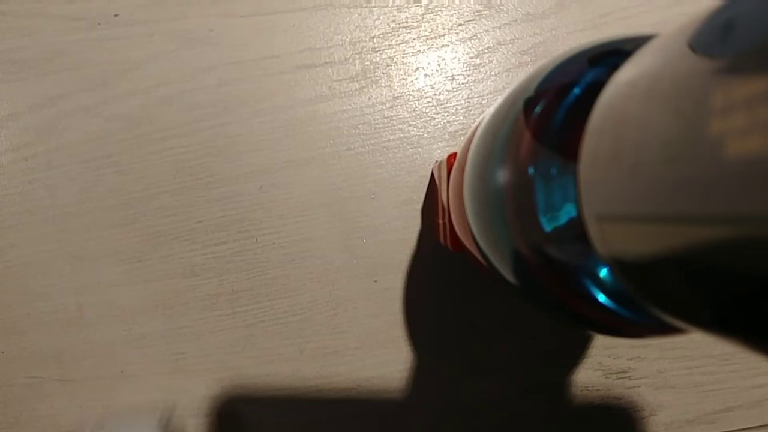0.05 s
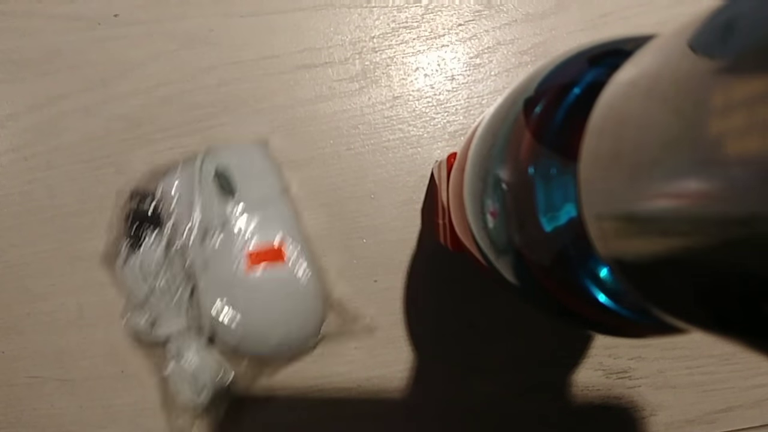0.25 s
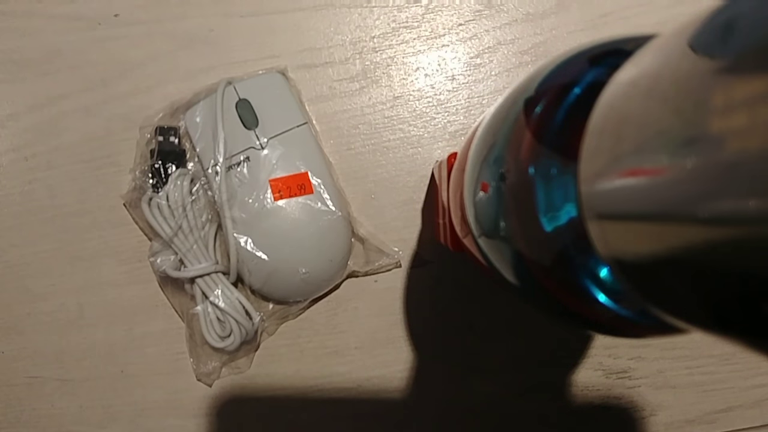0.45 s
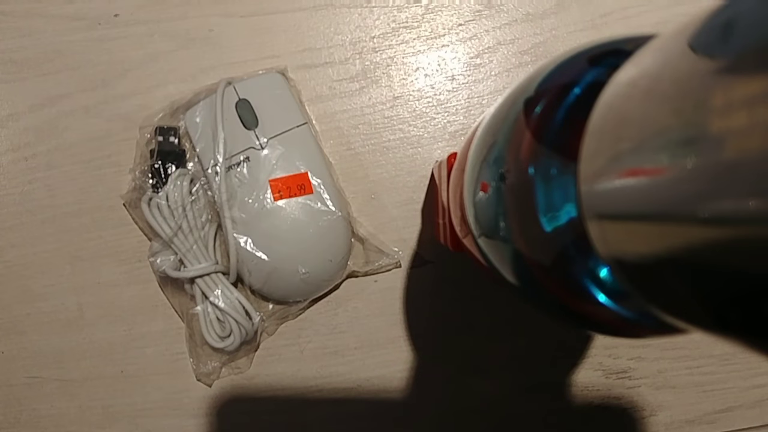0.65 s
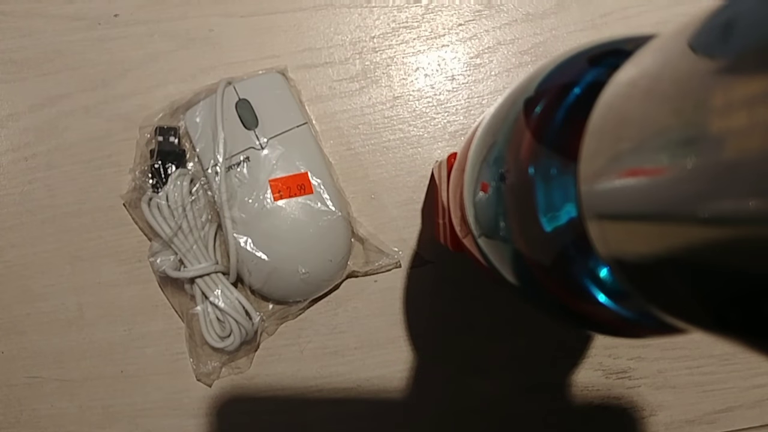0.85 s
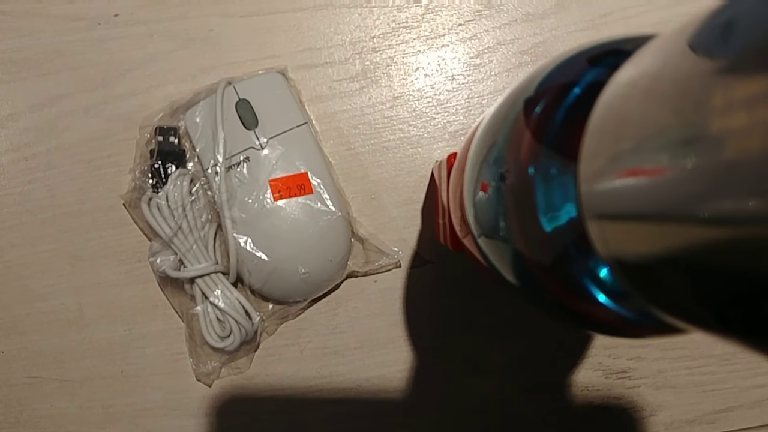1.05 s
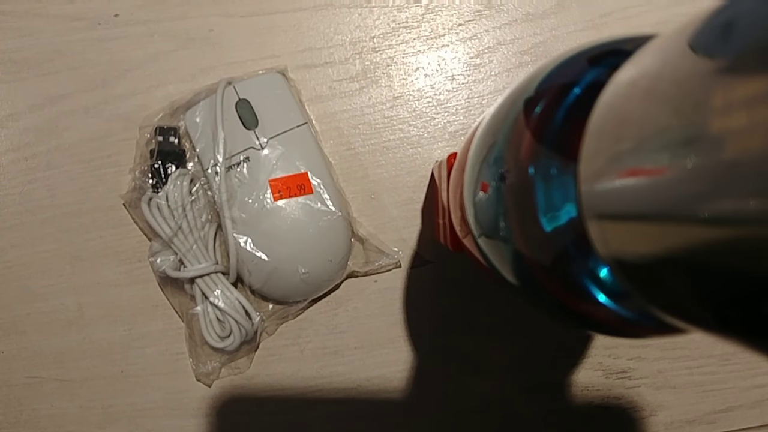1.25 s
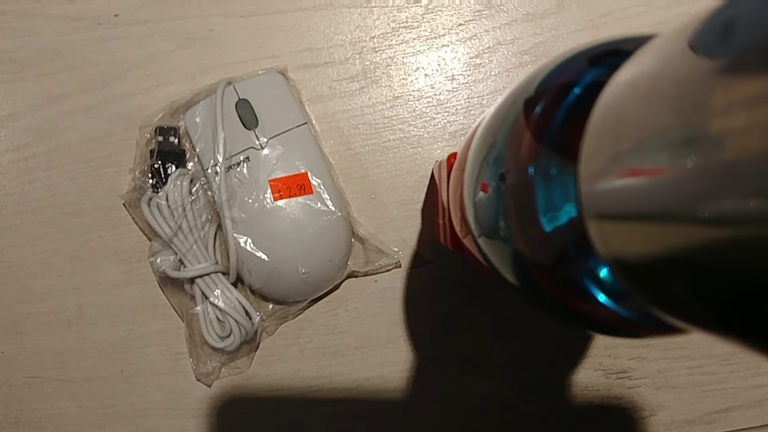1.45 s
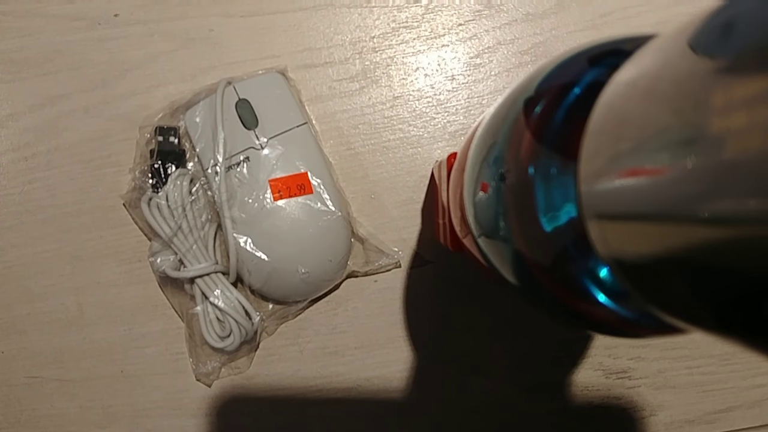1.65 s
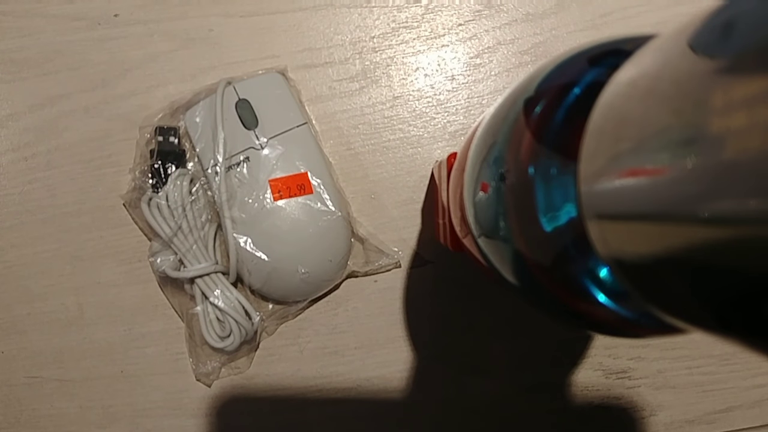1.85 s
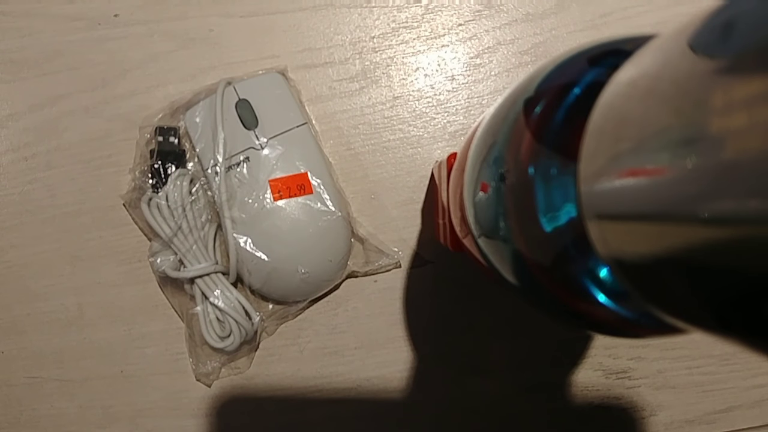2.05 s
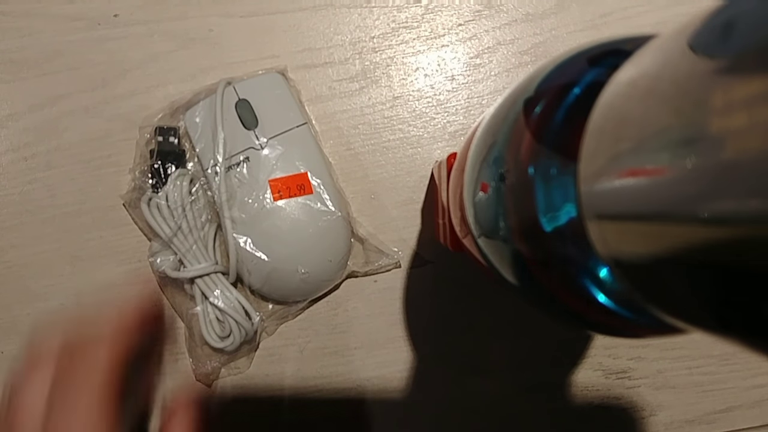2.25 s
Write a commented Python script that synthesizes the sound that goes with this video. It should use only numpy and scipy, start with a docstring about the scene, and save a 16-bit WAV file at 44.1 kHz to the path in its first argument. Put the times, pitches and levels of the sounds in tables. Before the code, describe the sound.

Plastic-wrapped mouse thuds onto a wooden table with a crinkle, then a faint hand rustle.

```python
"""A thin plastic bag crinkles as a computer mouse inside it is let go over a wooden table.
Mouse, plug and coiled cable land in a quick clatter that rings the table top, shakes the
close microphone and ends in a flat slap. The low rumble of a small quiet room runs
underneath, and at the end a hand rustles as it reaches in."""
import sys
import numpy as np
from scipy import signal
from scipy.fft import rfft, irfft, next_fast_len
from scipy.io import wavfile

SR = 44100
rng = np.random.default_rng(int(sys.argv[2]) if len(sys.argv) > 2 else 0)


def store_pcm(level_fs):
    """Save levels as 16-bit WAV."""
    pcm = np.round(np.clip(level_fs, -1, 1) * 32767).astype(np.int16)
    wavfile.write(sys.argv[1], SR, np.atleast_2d(pcm).T)


N = 101429
TIME_S = np.arange(N) / SR


def from_db(db):
    """Decibels to gain."""
    return 10 ** (np.asarray(db) / 20)


def at_hz(points, hz):
    """Table lookup on a log-frequency axis."""
    points_hz, values = np.transpose(points)
    return np.interp(np.log(hz + 1), np.log(points_hz), values)


def delayed(x, delay_s):
    """Fractional delay."""
    return np.interp(TIME_S - delay_s, TIME_S, x, left=0)


def coloured(x, colour):
    """Minimum-phase filter with the given spectrum."""
    size = 2 * next_fast_len(N)
    gain = from_db(at_hz(colour, np.fft.rfftfreq(size, 1 / SR)))
    cepstrum = irfft(np.log(gain))
    cepstrum[1:size // 2] *= 2
    cepstrum[size // 2 + 1:] = 0
    return irfft(rfft(x, size) * np.exp(rfft(cepstrum)))[..., :N]


def noise(colour, correlation):
    """Stereo noise, rms 1, with the given spectrum and channel correlation."""
    size = 2 * next_fast_len(N // 2 + 1)
    hz = np.fft.rfftfreq(size, 1 / SR)
    alike = np.clip(at_hz(correlation, hz), -.99, .99)
    mid, side = rfft(rng.standard_normal((2, size))) * from_db(at_hz(colour, hz))
    x = irfft(np.sqrt(1 + alike) * mid + np.sqrt(1 - alike) * side * [[1], [-1]])[:, :N]
    return x / x.std()


def clicks(times_s, db):
    """One impulse per event."""
    x = np.zeros(N)
    x[np.clip(np.asarray(times_s) * SR, 0, N - 1).astype(int)] = from_db(db)
    return x


def ring(x, hz, t60_s):
    """Resonator: a unit click starts a decaying sine of height 1."""
    r = np.exp(-np.log(1000) / (t60_s * SR))
    w = 2 * np.pi * hz / SR
    return signal.lfilter([0, np.sin(w)], [1, -2 * r * np.cos(w), r * r], x + 1e-18)


def struck(times_s, db, modes, spread_db=2):
    """Every blow rings every mode at a slightly random strength; modes alternate in sign."""
    scatter_db = spread_db * rng.standard_normal((len(times_s), len(modes)))
    return sum((-1) ** k * ring(clicks(times_s, db + mode_db + scatter_db[:, k]), hz, t60_s)
               for k, (hz, mode_db, t60_s) in enumerate(modes))


# left-right likeness of near sounds: (frequency [Hz], correlation [ratio])
NEAR_CORRELATION = [(150, 0.94), (600, 0.41), (1500, .3), (6000, 0.03)]
def burst(times_s, db, colour, t60_s):
    """Each blow rings a crowd of close resonances, as decaying noise; unit energy at 0 dB."""
    decay = np.exp(-2 * np.log(1000) / (t60_s * SR))
    power = signal.lfilter([1 - decay], [1, -decay], clicks(times_s, db) ** 2 + 1e-18)
    return np.sqrt(power) * noise(colour, NEAR_CORRELATION)


# crinkle envelope as the bag slips, falls, lands and settles: (time [s], level [dB])
CRINKLE_ENVELOPE = [(0, -59.5), (.12, -61.5), (.145, -42.5), (.17, -47.5), (.214, -46.5), (.228, -23),
                    (.28, -26.5), (.35, -46), (.47, -58), (.53, -80)]
# film spectrum: (frequency [Hz], level [dB])
FILM_COLOUR = [(200, -8), (620, -3.5), (1000, -6), (2200, -6.5), (3500, -3.5), (5600, -4.5), (8400, -1.5),
               (10200, -24), (15000, -14)]
def bag_crinkle(snaps_per_s=2000, spread_db=3.5):
    """Thin film crinkles in dense tiny snaps of uneven size."""
    sizes = from_db(spread_db * np.minimum(rng.exponential(1, (2, N)), 4))
    signs = rng.choice([-1, 1], (2, N))
    snapping = rng.random((2, N)) < snaps_per_s / SR
    film = coloured(sizes * signs * snapping, FILM_COLOUR)
    envelope_db = np.interp(TIME_S, *np.transpose(CRINKLE_ENVELOPE), right=-np.inf)
    return from_db(envelope_db) * film / film.std()


# rumble and hiss spectrum: (frequency [Hz], level [dB])
RUMBLE_COLOUR = [(15, -67.5), (25, -37.5), (45, -16), (73, -0.5), (131, -11), (163, -2.5), (207, -12),
                 (286, -8), (400, -15), (588, -16.5), (800, -20.5), (1300, -22.5), (2180, -28), (9270, -44),
                 (15000, -44)]
# its left-right likeness: (frequency [Hz], correlation [ratio])
RUMBLE_CORRELATION = [(60, 0.83), (300, 1), (1000, 0.67), (3000, 0.037)]
# low room resonances: (frequency [Hz], level [dB], t60 [s])
DRONE_MODES = [(92, -70.5, 0.57), (180, -71.5, 0.25)]
def room_tone(rumble_db=-56.5, left_gain_db=2, left_lag_s=.00041):
    """Steady rumble and faint hiss; the room's low resonances add wavering drones."""
    tone = from_db(rumble_db) * noise(RUMBLE_COLOUR, RUMBLE_CORRELATION)
    for hz, db, t60_s in DRONE_MODES:
        drone = ring(rng.standard_normal(N + SR), hz, t60_s)[SR:]
        tone += from_db(db) * drone / drone.std()
    left, right = tone
    return np.array([from_db(left_gain_db) * delayed(left, left_lag_s), right])


# bumps in the fingers: (time [s], level [dB])
BUMPS = [(.029, -47.5), (.147, -38), (.196, -44)]
# hollow mouse body: (frequency [Hz], level [dB], t60 [s])
HOLLOW_MODES = [(600, -2, .045), (665, -5, .028)]
def mouse_bumps():
    """The mouse knocks hollowly in the fingers as it is let go."""
    return struck(*np.transpose(BUMPS), HOLLOW_MODES)


# single creases: (time [s], level [dB], pitch [Hz])
CREASES = [(0.0314, -24, 5800), (0.067, -25.5, 7300), (.1295, -30, 6500), (.1392, -23, 7500),
           (0.1476, -21.5, 5150), (0.1828, -15, 6000), (0.196, -22.5, 5000)]
# snap spectrum: (frequency [Hz], level [dB])
CREASE_COLOUR = [(400, -21), (3800, -13.5), (5800, 0), (8000, -3), (10000, -31), (15000, -32)]
def bag_creases(ping_gain_db=-13):
    """Each crease snaps and rings briefly at its own pitch."""
    times_s, snap_db, _ = np.transpose(CREASES)
    snaps = burst(times_s, snap_db, CREASE_COLOUR, t60_s=.016)
    pings = sum(ring(clicks([s], db + ping_gain_db), hz, t60_s=.009) for s, db, hz in CREASES)
    return snaps + pings


# contacts with the table: (time [s], wood knock [dB], plastic clack [dB], shell rap [dB])
CONTACTS = [(.2232, -4.5, 1.5, -2.5), (0.2305, -1.5, -0.5, -5), (.2355, -7.5, -14, -8),
            (0.2461, -5, -8, -12.5), (0.2538, -8.5, -5, -17.5), (0.2578, -1, -8, -10.5),
            (0.2629, -5.5, -11, -7), (0.2695, -2.5, -10, -20), (.2790, -5, -8, -9),
            (0.2844, -7, -10.5, -18), (0.2874, -3.5, -9, -19)]
# table top: (frequency [Hz], level [dB], t60 [s])
TABLE_MODES = [(80, -26, .17), (102.45, -24.5, 0.19), (174.5, -25, 0.25), (238.6, -25.5, 0.16),
               (281, -29, .15), (395, -25, 0.12), (458.7, -17, 0.16), (547, -26, .14), (590, -23, 0.21),
               (662, -19, 0.1), (740, -21.5, 0.07), (819, -20.5, 0.064), (1005, -27.5, 0.074)]
# broad resonances of a hard rap: (frequency [Hz], level [dB], t60 [s])
RAP_MODES = [(652, -6, 0.048), (1080, -11.5, 0.0086), (1797, -10.5, 0.0012), (2724, -12, 0.0074)]
# plastic shell: (frequency [Hz], level [dB])
SHELL_MODES = [(2108, -26), (2406, -28), (5768, -26), (6230, -27), (7828, -27)]
# dense ring of wood: (frequency [Hz], level [dB])
WOOD_COLOUR = [(60, -19), (150, -8), (250, -12), (340, -11.5), (520, -3.5), (720, 2.5), (1400, -17),
               (2100, -10.5), (4000, -16), (10000, -40)]
# dense ring of plastic: (frequency [Hz], level [dB])
PLASTIC_COLOUR = [(300, -12.5), (1400, -9.5), (2500, -2), (3900, -5), (5500, -3.5), (8000, -1), (9300, -7),
                  (10300, -32), (12500, -14), (15000, -13)]
def landing(wood_gain_db=14, clack_gain_db=13.5, snap_gain_db=6, shell_t60_s=.09, left_lag_s=.00039):
    """Each contact knocks the wood and raps the shell; the table's ring reaches the left last."""
    times_s, knock_db, clack_db, rap_db = np.transpose(CONTACTS)
    table = struck(times_s, knock_db, TABLE_MODES)
    rap = struck(times_s, rap_db, RAP_MODES)
    shell = struck(times_s, clack_db, [(hz, db, shell_t60_s) for hz, db in SHELL_MODES])
    wood = burst(times_s, knock_db + wood_gain_db, WOOD_COLOUR, t60_s=.038)
    clack = burst(times_s, clack_db + clack_gain_db, PLASTIC_COLOUR, t60_s=.053)
    snap = burst(times_s, clack_db + snap_gain_db, PLASTIC_COLOUR, t60_s=.007)
    return np.array([delayed(table, left_lag_s), table]) + rap + shell + wood + clack + snap


# the weight sinks into the table: (time [s], level [dB])
JOLTS = [(.238, -9.5), (0.254, -9.5), (0.266, -10.5)]
# table giving under load: (frequency [Hz], level [dB], t60 [s])
THUD_MODES = [(114.5, -3, 0.17), (176, -4.5, .09)]
# sideways microphone sway: (frequency [Hz], level [dB], t60 [s])
SWAY_MODES = [(78, -3.5, 0.13), (128, -2, 0.023)]
def shaken_microphone():
    """The table thuds and the microphone sways, in antiphase between the channels."""
    times_s, db = np.transpose(JOLTS)
    thud = struck(times_s, db, THUD_MODES)
    sway = struck(times_s, db, SWAY_MODES)
    return thud + sway * np.array([[1], [-1]])


# last hit: (time [s], level [dB])
SLAPS = [(.2874, 1)]
# its resonances: (frequency [Hz], level [dB], t60 [s])
SLAP_MODES = [(830, -2.5, .022), (1500, -9, .011), (2050, -7, .01), (2700, -8, .008)]
def slap():
    """The mouse slaps down flat, ringing a few quickly damped modes."""
    return struck(*np.transpose(SLAPS), SLAP_MODES)


# swish spectrum: (frequency [Hz], level [dB])
SWISH_COLOUR = [(70, 10), (250, 5.5), (600, 6.5), (1000, -0.5), (2400, -1), (4000, -5), (8300, -3.5),
                (10500, -35), (15000, -15)]
# hand touching the table: (time [s], level [dB])
BRUSHES = [(2.259, -46.5)]
def hand(peak_s=2.233, swish_db=-54, rise_db_per_s=166, fall_db_per_s=104, ring_gain_db=-20.5):
    """A reaching hand: a soft swish with a narrow treble resonance, and a light touch on the table."""
    below_peak_db = np.maximum((peak_s - TIME_S) * rise_db_per_s, (TIME_S - peak_s) * fall_db_per_s)
    swish = from_db(swish_db - below_peak_db) * noise(SWISH_COLOUR, NEAR_CORRELATION)
    resonance = from_db(ring_gain_db) * ring(swish, hz=5370, t60_s=.0043)
    touch = struck(*np.transpose(BRUSHES), TABLE_MODES + THUD_MODES)
    return swish + resonance + touch


def diffuse_decay(colour, t60_s):
    """Close resonances dying together: a stereo impulse response of unit energy."""
    envelope = np.exp(-np.log(1000) * TIME_S / t60_s)
    x = (noise(colour, NEAR_CORRELATION) * envelope)[:, :SR // 2]
    return x / np.sqrt(np.sum(x ** 2, axis=1, keepdims=True))


# early reflections by band: (upper edge [Hz], level [dB], t60 [s])
REFLECTION_BANDS = [(200, -4, .22), (536, -5, 0.21), (976, -9, 0.12), (2700, -5, 0.19), (16106, -4.5, .21)]
# late tail spectrum: (frequency [Hz], level [dB])
TAIL_COLOUR = [(300, -1), (800, -8), (2400, -4), (15000, 3)]
def room_reverb(x, low_hz=50, tail_db=-27.5, wall_delay_s=.004):
    """Near surfaces answer quickly, driest in the midrange; the walls leave a faint longer tail."""
    response = from_db(tail_db) * diffuse_decay(TAIL_COLOUR, t60_s=.42)
    flat = [(1, 0)]
    for high_hz, db, t60_s in REFLECTION_BANDS:
        band = signal.butter(3, [low_hz, high_hz], "band", fs=SR, output="sos")
        response += from_db(db) * signal.sosfilt(band, diffuse_decay(flat, t60_s))
        low_hz = high_hz
    wet = signal.fftconvolve(x, response, axes=1)[:, :N]
    return np.array([delayed(channel, wall_delay_s) for channel in wet])


def scene(low_cut_hz=50):
    """Bagged mouse and hand in the room; the microphone loses the deepest bass."""
    near = landing() + slap() + bag_crinkle() + bag_creases() + mouse_bumps() + hand()
    low_cut = signal.butter(4, low_cut_hz, "high", fs=SR, output="sos")
    return signal.sosfilt(low_cut, near + room_reverb(near) + shaken_microphone() + room_tone())


def record(dry, ceiling=.85, cutoff_hz=15450):
    """Soft clip, then a steep low-pass."""
    low_pass = signal.ellip(10, .3, 75, cutoff_hz, fs=SR, output="sos")
    return signal.sosfilt(low_pass, ceiling * np.tanh(dry / ceiling))


dry = scene()
out = record(dry)
store_pcm(out)
```